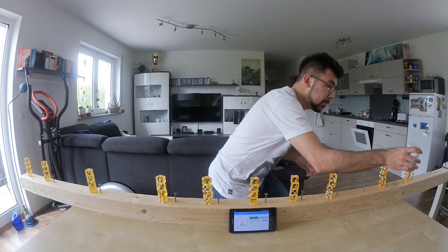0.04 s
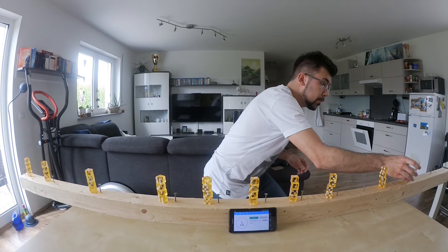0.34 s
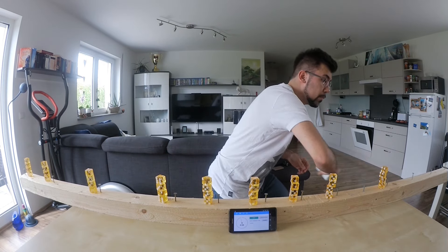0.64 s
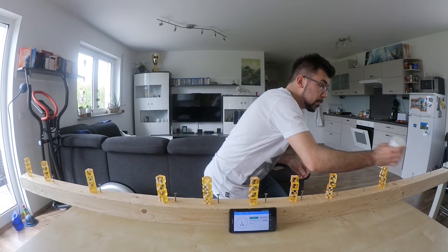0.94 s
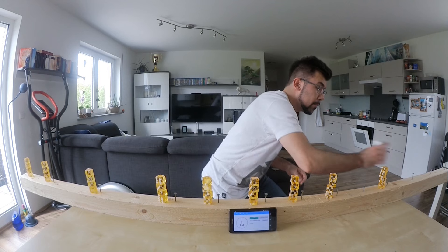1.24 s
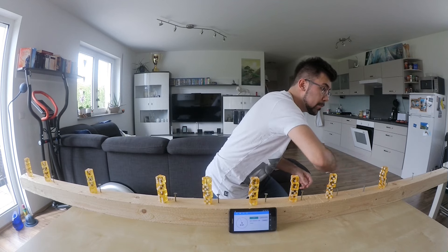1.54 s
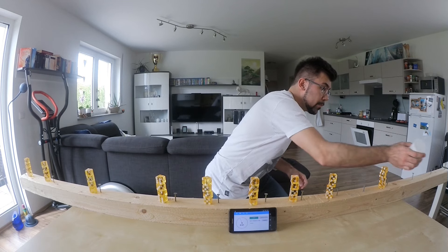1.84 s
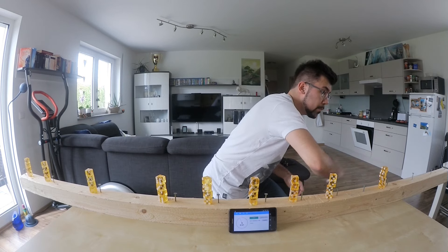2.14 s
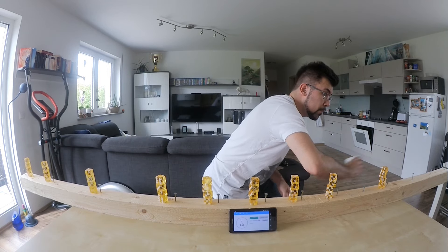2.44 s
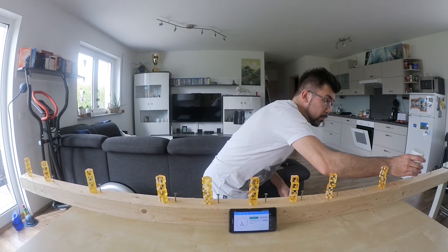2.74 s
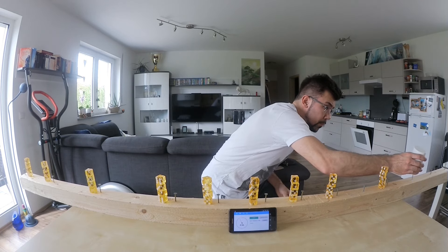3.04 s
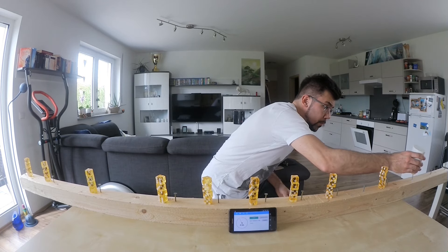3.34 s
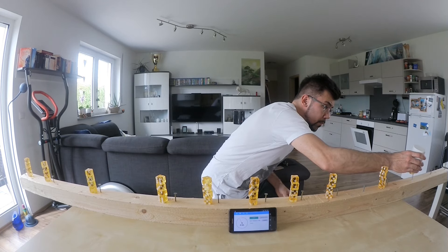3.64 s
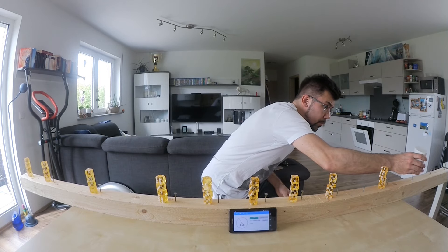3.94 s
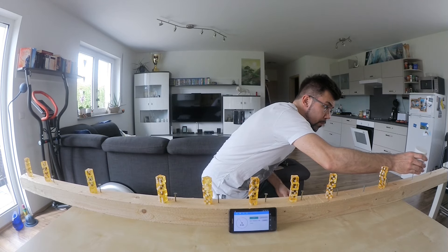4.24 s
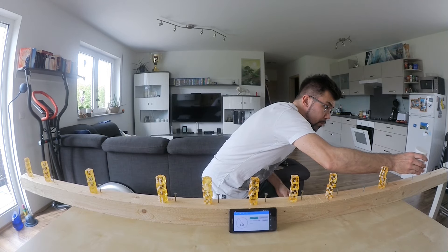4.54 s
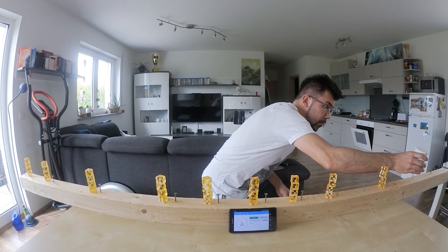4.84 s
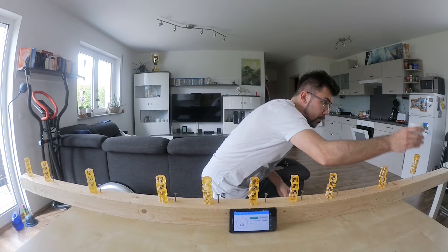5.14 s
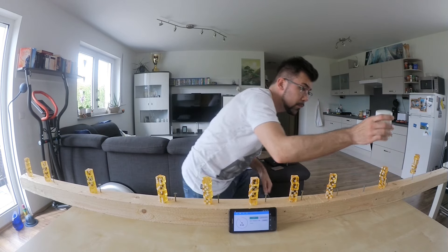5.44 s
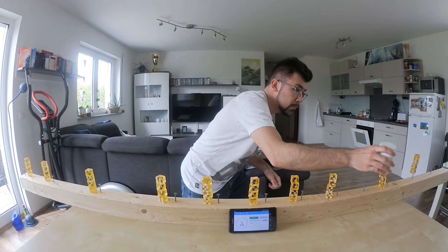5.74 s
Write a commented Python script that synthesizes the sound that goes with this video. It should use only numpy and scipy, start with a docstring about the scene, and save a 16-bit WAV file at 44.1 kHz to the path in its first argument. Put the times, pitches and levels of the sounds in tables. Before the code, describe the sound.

Dice rattle in a swung plastic cup, which is slammed onto a wooden board, nudged along and lifted in a quiet room.

```python
"""Dice stacking in a living room

At a wooden board, heard through a close pair of microphones: an upturned plastic cup scoops up dice and
is swung from side to side, so that they skid round its wall and sound its hollow. The cup is slammed
down, then nudged over the board while the dice knock inside. At the end it is lifted, a shirt rustles
and the floor rumbles under a shifting body."""
import sys
import numpy as np
from scipy import signal
from scipy.fft import rfft, irfft
from scipy.io import wavfile

SR = 44100
rng = np.random.default_rng(int(sys.argv[2]) if len(sys.argv) > 2 else 0)


def store_wav(level_fs):
    """Save 16-bit WAV to argv[1]."""
    pcm = np.round(np.clip(np.atleast_2d(level_fs), -1, 1) * 32767)
    wavfile.write(sys.argv[1], SR, pcm.T.astype(np.int16))


N = 255780


def from_db(db):
    return 10 ** (np.asarray(db) / 20)


def unit_rms(x):
    return x / np.sqrt(np.mean(x ** 2) + 1e-20)


def at_hz(points, hz):
    """Reads a table on a log-frequency axis."""
    points_hz, values = np.transpose(points)
    return np.interp(np.log(np.maximum(hz, 1)), np.log(points_hz), values)


def coloured(x, spectrum):
    """Gives a steady sound a spectrum; rms 1."""
    gain = from_db(at_hz(spectrum, np.fft.rfftfreq(N, 1 / SR)))
    return unit_rms(irfft(rfft(x) * gain, N))


def passband(x, hz, kind):
    return signal.sosfilt(signal.butter(2, hz, kind, fs=SR, output="sos"), x)


def resonate(x, modes):
    """Parallel resonances of alternating sign."""
    out = 0
    for k, (hz, width_hz, db) in enumerate(modes):
        radius = np.exp(-np.pi * width_hz / SR)
        poles = [1, -2 * radius * np.cos(2 * np.pi * hz / SR), radius ** 2]
        ring = (1 - radius ** 2) / 2 * signal.lfilter([1, 0, -1], poles, x + 1e-18)
        out = out + (-1) ** k * from_db(db) * ring
    return out


def grains(per_s, spread_db):
    """Tiny contacts at random moments, of uneven strength."""
    sizes = from_db(spread_db * np.minimum(rng.exponential(1, N), 4)) * rng.choice([-1, 1], N)
    return sizes * (rng.random(N) < per_s / SR)


def swell(peak_s, rise_s, fall_s):
    """A bell-shaped envelope that reaches 1 at peak_s."""
    t = np.arange(N) / SR - peak_s
    return np.exp(-np.minimum((t / np.where(t < 0, rise_s, fall_s)) ** 2, 100))


# how alike the room sounds at the left and right microphone: frequency_hz, correlation
MIC_LIKENESS = [(50, .75), (150, .97), (300, .88), (700, .4), (1500, .2), (3500, .25), (8000, .35),
                (14000, .55)]
def diffuse_noise(size):
    """White noise from all around, as two closely spaced microphones hear it."""
    mid, side = rfft(rng.standard_normal((2, size)))
    alike = at_hz(MIC_LIKENESS, np.fft.rfftfreq(size, 1 / SR))
    return irfft(np.sqrt((1 + alike) / 2) * mid + np.sqrt((1 - alike) / 2) * side * [[1], [-1]], size)


# spectrum of the still living room: frequency_hz, gain_db
ROOM_TONE_SPECTRUM = [(12, -46), (20, -8.5), (49, -10), (146, -2.5), (388, -8.5), (446, -7.5), (780, -17),
                      (949, -14), (2600, -21), (5380, -21), (7310, -25), (8180, -22), (14300, -38),
                      (16000, -46.5)]
def room_tone(level_db=-63.5):
    """Faint steady noise reaches the microphones from all sides."""
    return from_db(level_db) * coloured(diffuse_noise(N), ROOM_TONE_SPECTRUM)


# how long the living room rings: frequency_hz, t60_s
ROOM_DECAY = [(100, 1), (300, 0.46), (1000, 0.57), (2500, 0.65), (6000, .5), (12000, .43)]
# reverberation against direct sound at the microphones: frequency_hz, level_db
ROOM_SHARE = [(100, -3), (300, -2), (900, -0.5), (2500, 0), (7000, -1), (13000, -3.5)]
def living_room(direct, build_s=.006):
    """Direct sound in the centre, plus a stereo tail that builds up and dies band by band."""
    t, hz = np.arange(SR) / SR, np.fft.rfftfreq(SR, 1 / SR)
    edges_hz = np.geomspace(40, 18000, 25)
    noise, tail = rfft(diffuse_noise(SR)), 0
    for low, high in zip(edges_hz, edges_hz[1:]):
        centre_hz, inside = np.sqrt(low * high), (hz >= low) & (hz < high)
        decay = np.exp(-np.log(1000) * t / at_hz(ROOM_DECAY, centre_hz)) * (1 - np.exp(-t / build_s))
        band = unit_rms(irfft(noise * inside, SR) * decay)
        band *= np.sqrt(inside.mean() / SR)   # as strong as the direct sound
        tail = tail + from_db(at_hz(ROOM_SHARE, centre_hz)) * band
    return direct + signal.fftconvolve(direct[None], tail, axes=1)[:, :N]


# spectrum of the floor underfoot: frequency_hz, gain_db
FLOOR_SPECTRUM = [(30, -18), (62, 0), (90, -4), (150, 0), (250, -18), (400, -39)]
# weight lands on the floor: peak_s, level_db
FLOOR_THUDS = [(5.603, -52), (5.765, -54)]
def shifting_weight(rise_s=.01, fall_s=.055):
    """The floor rumbles under the moving body."""
    level = sum(from_db(db) * swell(s, rise_s, fall_s) for s, db in FLOOR_THUDS)
    return level * coloured(rng.standard_normal(N), FLOOR_SPECTRUM)


# spectrum of rubbing cloth: frequency_hz, gain_db
CLOTH_SPECTRUM = [(88, -31), (150, -13), (225, -7), (425, -3), (883, -6), (972, -1.5), (1400, -5.5),
                  (6180, -9.5), (10400, -16), (13600, -35.5), (15000, -63)]
# moves of arm and body: peak_s, relative_db, half_length_s
BODY_MOVES = [(0.0, -53, .06), (0.29, -55, .1), (5.35, -54.5, .042), (5.54, -53.5, .085),
              (5.612, -42.5, .028), (5.71, -44.3, .085)]
def shirt(gain_db=-4):
    """Cloth fibres slip in dense grains with each move."""
    fibres = coloured(grains(7000, spread_db=5.5), CLOTH_SPECTRUM)
    power = sum((from_db(db + gain_db) * swell(s, half_s, half_s)) ** 2 for s, db, half_s in BODY_MOVES)
    return fibres * np.sqrt(power)


# resonances of the wooden board: pitch_hz, width_hz, gain_db
BOARD_MODES = [(65, 12, -26), (140, 12, -20), (205, 9, 5), (288, 22, -1), (339, 22, 1), (418, 34, 3.7),
               (520, 130, -6), (668, 82, 3)]
# resonances of the cup's mouth at the board: pitch_hz, width_hz, gain_db
MOUTH_MODES = [(700, 85, 6), (845, 86, 8), (1160, 120, -9)]
# spectrum of the board's rumble: frequency_hz, gain_db
RUMBLE_SPECTRUM = [(50, -25), (80, 6), (100, 7), (120, 7), (155, 12), (220, -8), (400, -54)]
# short pushes of the cup over the board: peak_s, relative_db
CUP_PUSHES = [(0.56, -35), (3.42, -61), (3.64, -58), (3.95, -58.5), (4.07, -59.5), (4.33, -61.5),
              (4.75, -66)]
def dragging(half_push_s=.04, hum_db=1, scuff_db=-13, rumble_db=-20, lift_db=-66):
    """The rim rubs over the board, which hums and rumbles; the cup's mouth scuffs along."""
    push = sum(from_db(db) * swell(s, half_push_s, half_push_s) for s, db in CUP_PUSHES)
    lift = swell(peak_s=4.9, rise_s=.5, fall_s=.5)   # the cup is eased up
    slips = grains(900, spread_db=6)
    hum = from_db(hum_db) * unit_rms(passband(resonate(slips, BOARD_MODES[2:6]), 160, "low"))
    scuff = from_db(scuff_db) * unit_rms(resonate(slips, MOUTH_MODES))
    rumble = coloured(rng.standard_normal(N), RUMBLE_SPECTRUM)
    return push * (hum + scuff) + (from_db(rumble_db) * push + from_db(lift_db) * lift) * rumble


# modes of the cup's wall: pitch_ratio, width_hz, gain_db
WALL_MODES = [(.55, 600, -5), (1, 230, 4), (1.6, 900, -6)]
def wall_ring(force, pitch_hz):
    """The plastic wall rings, soft in the treble, at a pitch set by the point of contact."""
    ring = resonate(force, [(ratio * pitch_hz, width_hz, db) for ratio, width_hz, db in WALL_MODES])
    return passband(passband(ring, 1.5 * pitch_hz, "low"), 2 * pitch_hz, "low")


def rebounds(gap_s=.00055, give=.6, count=3):
    """One blow as a few ms of ever smaller bounces; all-pass stages leave it uncoloured."""
    force = signal.unit_impulse(SR // 4)
    for k in range(count):
        bounce = np.zeros(round(gap_s * SR * np.exp(-k / 2)) + 1)
        bounce[0], bounce[-1] = 1, (-1) ** k * give
        force = signal.lfilter(bounce[::-1], bounce, force + 1e-18)
    return force


def blows(starts_s, levels_db, rings):
    """Places a ring at each strike; its level is that of its energy spread over 4 ms."""
    out = np.zeros(N + SR)
    for s, db, ring in zip(starts_s, levels_db, rings):
        start = round(s * SR)
        out[start:start + len(ring)] += from_db(db) * ring / np.linalg.norm(ring)
    return out[:N] * np.sqrt(.004 * SR)


# the cup scoops and is slammed down: start_s, mouth_db, board_over_mouth_db, hardness_db, wall_pitch_hz
CUP_KNOCKS = [(0.484, -50, 6, -5, 2400), (0.518, -31, 3, -18, 1900), (0.547, -23.5, 6.5, -8.5, 1350),
              (0.56, -19, -.5, -34, 1990), (0.573, -23.5, 7.5, -9.5, 2330), (0.584, -24.5, -7, 4, 2500),
              (0.5905, -25.5, 7, -5.5, 2500), (0.618, -19, -5, -15, 1740), (0.635, -25, -8, -8, 1600),
              (2.0083, -17, -18, -8, 2300), (2.8157, -26.5, 11, 12, 2200)]
# dice tap inside the standing cup: start_s, board_db, wall_pitch_hz
DICE_TAPS = [(3.203, -39.5, 2310), (3.7175, -34.5, 2620), (3.7707, -34.2, 2600), (3.893, -42, 2600),
             (4.233, -41, 1950), (4.505, -50.5, 1970), (4.549, -48, 2000)]
def strikes(firm_tap_db=-34.5):
    """Shares out each knock and tap: start_s, board_db, mouth_db, wall_db, dice_db, wall_pitch_hz."""
    rows = []
    for s, db, board_over_db, hardness_db, hz in CUP_KNOCKS:
        wall_db = db - 2 + .65 * hardness_db
        rows.append((s, db + board_over_db, db, wall_db, db + hardness_db, hz))
    for s, db, hz in DICE_TAPS:
        firmness_db = db - firm_tap_db   # softer taps are duller
        mouth_db = db - 12 - .5 * firmness_db
        wall_db = db - 6.5 + 1.5 * firmness_db
        dice_db = db - 13 + 3 * firmness_db
        rows.append((s, db, mouth_db, wall_db, dice_db, hz))
    return rows


# resonances of the hard dice: pitch_hz, width_hz, gain_db
DICE_MODES = [(3900, 2250, -10), (5850, 1400, -5), (7110, 1370, -1.5), (8420, 2420, -7.4)]
def knocks(crack_db=-26):
    """Each strike sounds the board, the cup's mouth and wall, and the hard dice."""
    starts_s, board_db, mouth_db, wall_db, dice_db, wall_hz = np.transpose(strikes())
    force = rebounds()
    board = passband(resonate(force, BOARD_MODES), 2000, "low")
    mouth = passband(passband(resonate(force, MOUTH_MODES), 2000, "low"), 2600, "low")
    click = resonate(resonate(force, DICE_MODES), DICE_MODES)   # passes from die to die, so rings twice
    crack = from_db(crack_db) * passband(force, [5000, 11000], "band")
    dice = passband(click + crack, 9800, "low")
    out = blows(starts_s, wall_db, [wall_ring(force, hz) for hz in wall_hz])
    for levels_db, ring in [(board_db, board), (mouth_db, mouth), (dice_db, dice)]:
        out += blows(starts_s, levels_db, [ring] * len(starts_s))
    return out


# the cup's wall at three points of contact: pitch_hz
CONTACT_PITCHES = [1500, 2120, 2680]
def tumbling(taps_per_s=120):
    """Now and then a die tips over an edge and taps the wall, here or there; rms 1."""
    return unit_rms(sum(wall_ring(grains(taps_per_s, spread_db=2.6), hz) for hz in CONTACT_PITCHES))


# swings of the cup, about four a second: peak_s, relative_db, half_length_s, treble_offset_db
CUP_SWINGS = [(0.56, -41, .027, -12), (0.644, -24.5, .034, -6.2), (0.79, -29.4, .036, -3.3),
              (1.027, -29.1, .031, -4.7), (1.247, -29.2, .035, -1), (1.445, -29, .035, -1.8),
              (1.688, -30.3, .035, -2.8), (1.915, -40.5, .035, -8.5), (1.971, -29.3, .019, -6.8),
              (2.054, -35.2, .036, -15), (2.298, -38, .041, -6.3)]
# the cup brakes and the dice whirl on inside: peak_s, relative_db, rise_s, fall_s, treble_offset_db
LAST_WHIRL = (2.703, -33.5, .008, .06, 1.5)
def swinging(steepness, slide_db, treble=False, fall_ratio=.98, slide_lead_s=.072):
    """Level of the rattle: dice slide softly, then are flung to the wall; steeper means briefer."""
    swings = [(s, db, half_s, fall_ratio * half_s, treble_db) for s, db, half_s, treble_db in CUP_SWINGS]
    power = 0
    for s, db, rise_s, fall_s, treble_db in swings + [LAST_WHIRL]:
        slide = from_db(slide_db) ** 2 * swell(s - slide_lead_s, rise_s=.016, fall_s=.05) ** steepness
        fling = swell(s, rise_s, fall_s) ** steepness
        power = power + from_db(db + treble * treble_db) ** 2 * (slide + fling)
    return np.sqrt(power)


# spectrum of dice skidding on plastic: frequency_hz, gain_db
SCRAPE_SPECTRUM = [(120, -30), (300, -10.5), (550, -2.3), (700, 0), (1100, 6.3), (1500, 7), (1900, 0.5),
                   (2750, 4), (3200, -2.5), (4400, -3), (5400, -0.5), (7500, -2), (9500, -7), (12500, -19),
                   (15500, -42)]
# resonances of the air in the cup: pitch_hz, width_hz, gain_db
HOLLOW_MODES = [(778, 40, -5), (854, 48, 0)]
# the hollow rings more once the cup's mouth is clear of the board: time_s, gain_db
MOUTH_OPENING = [(0.65, -5.5), (1.0, 1.3), (1.95, 3.7), (2.72, -.5)]
def skidding(contacts_per_s=9000, split_hz=4400, body_db=-3, treble_db=-1, air_db=-3, clatter_db=-6):
    """Dice skid on the wall and ring the cup's air; a faster swing makes more contacts and treble."""
    level = swinging(steepness=.86, slide_db=-20.5)
    treble_level = swinging(steepness=1.25, slide_db=-24, treble=True)
    air_level = swinging(steepness=.72, slide_db=-15.5)
    opening_db = np.interp(np.arange(N) / SR, *np.transpose(MOUTH_OPENING))
    speed = np.sqrt(level / level.max() + .0034)
    contacts = grains(contacts_per_s * speed, spread_db=2) / np.sqrt(speed)   # even power at any rate
    scrape = coloured(contacts, SCRAPE_SPECTRUM)
    body = from_db(body_db) * level * unit_rms(passband(scrape, split_hz, "low"))
    treble = from_db(treble_db) * treble_level * unit_rms(passband(scrape, split_hz, "high"))
    air = from_db(air_db + opening_db) * air_level * unit_rms(resonate(contacts, HOLLOW_MODES))
    clatter = from_db(clatter_db) * level * tumbling()
    return body - treble + air + clatter   # the minus avoids a notch at split_hz


def scene():
    """All sources sound in the living room, over its faint steady noise."""
    background = room_tone()
    return background + living_room(skidding() + knocks() + dragging() + shirt() + shifting_weight())


def record(dry, cutoff_hz=15700):
    """Both microphone channels pass a steep treble cut."""
    return signal.sosfilt(signal.ellip(10, .1, 80, cutoff_hz, fs=SR, output="sos"), dry)


dry = scene()
out = record(dry)
store_wav(out)
```